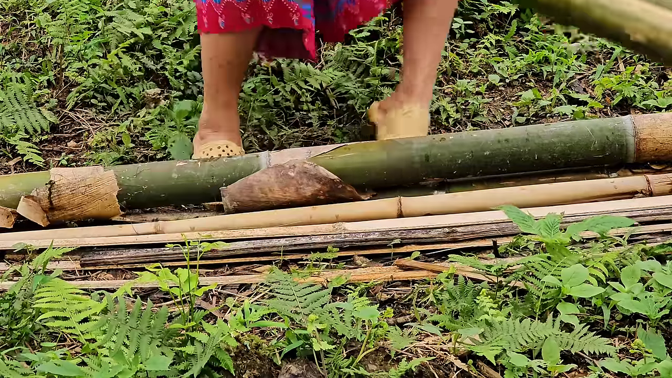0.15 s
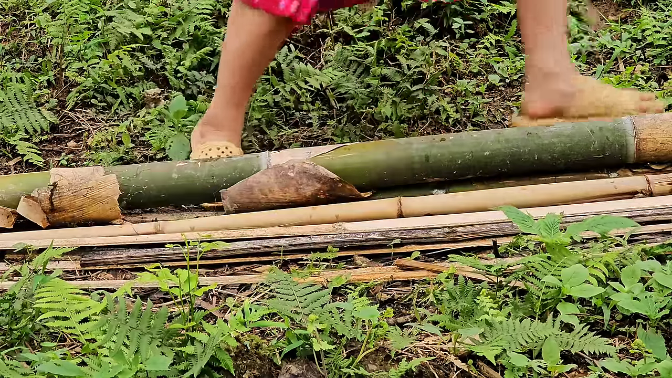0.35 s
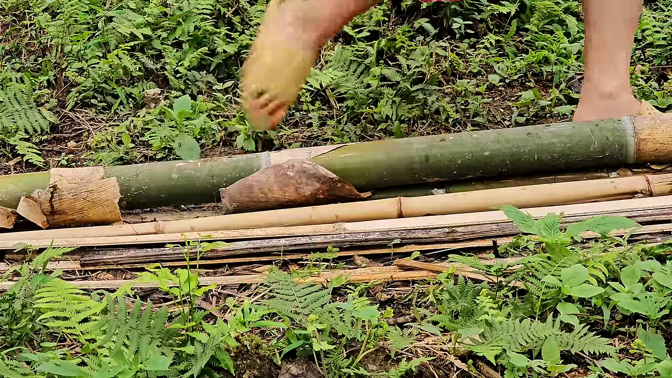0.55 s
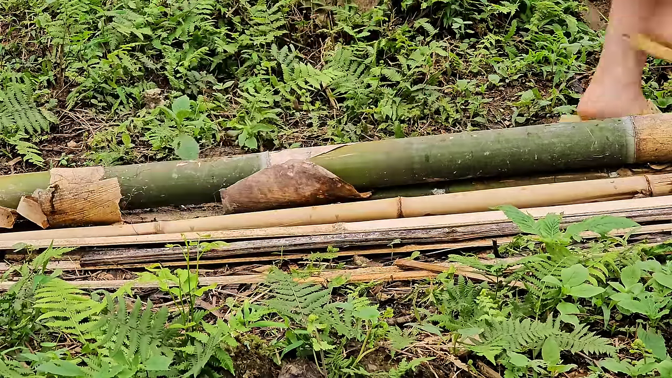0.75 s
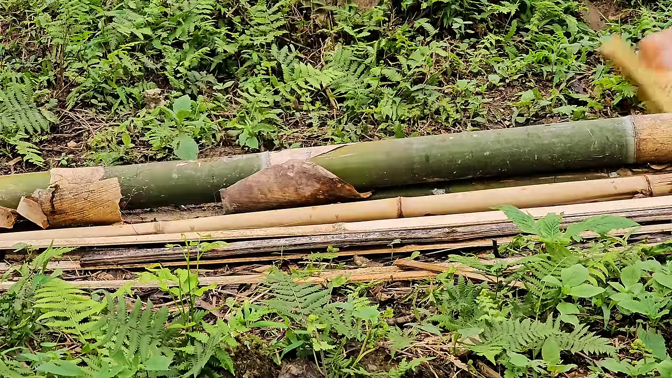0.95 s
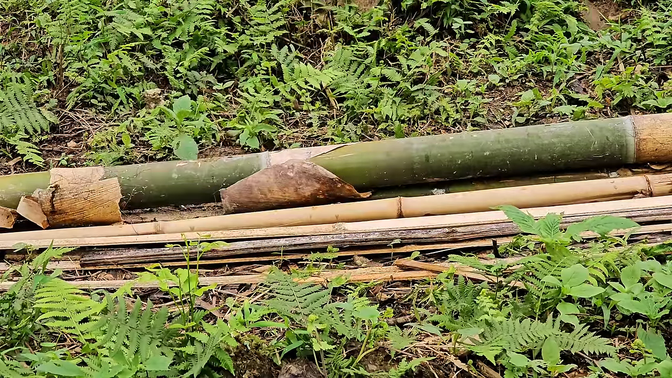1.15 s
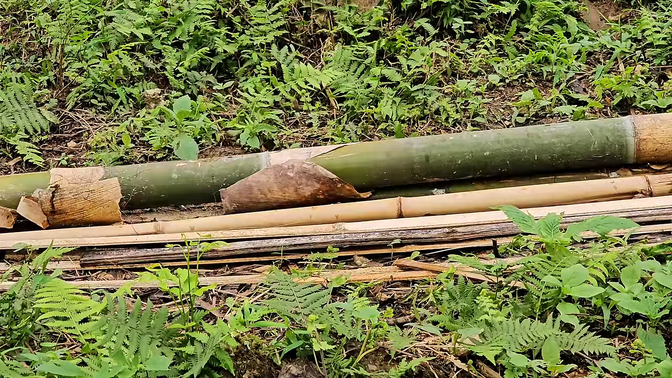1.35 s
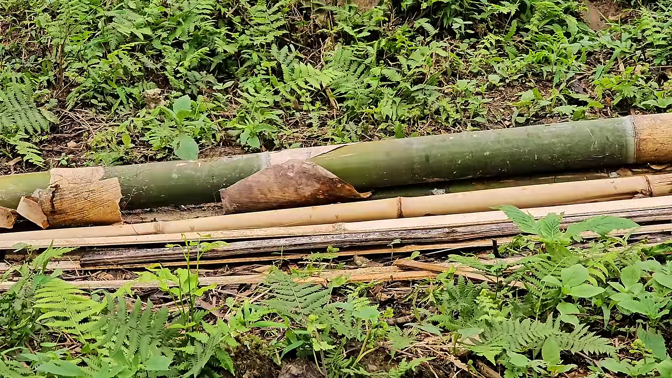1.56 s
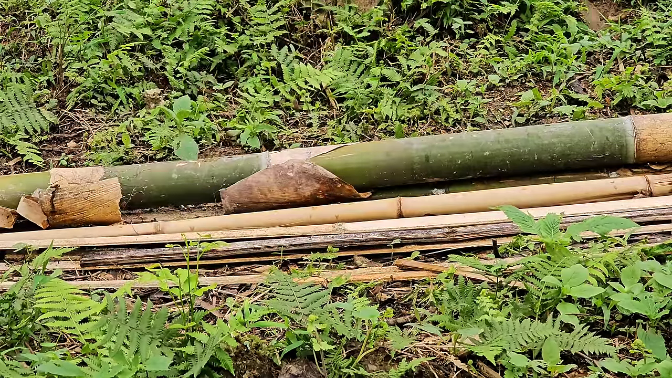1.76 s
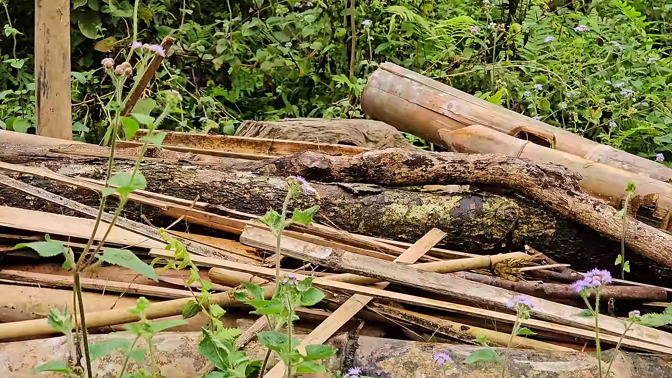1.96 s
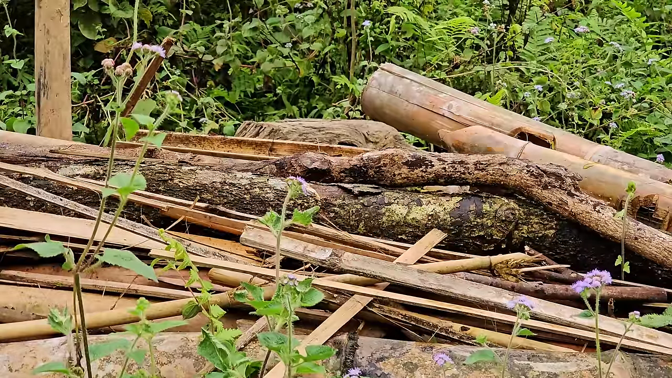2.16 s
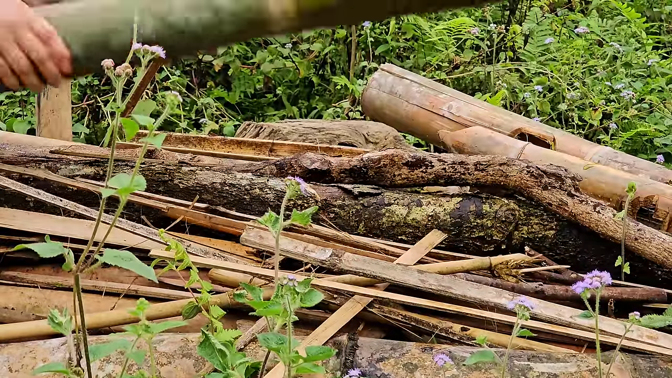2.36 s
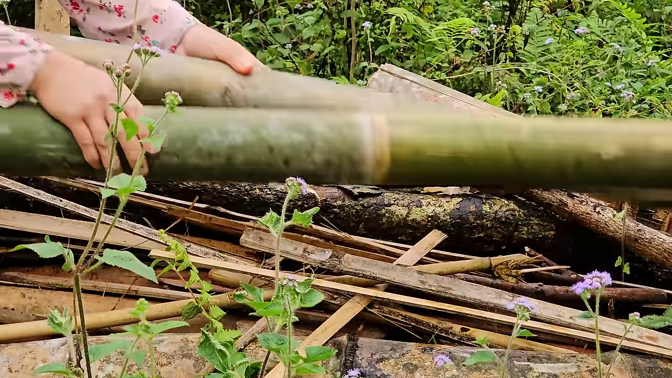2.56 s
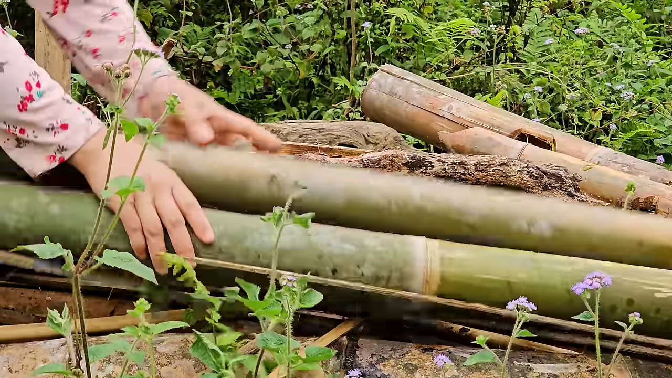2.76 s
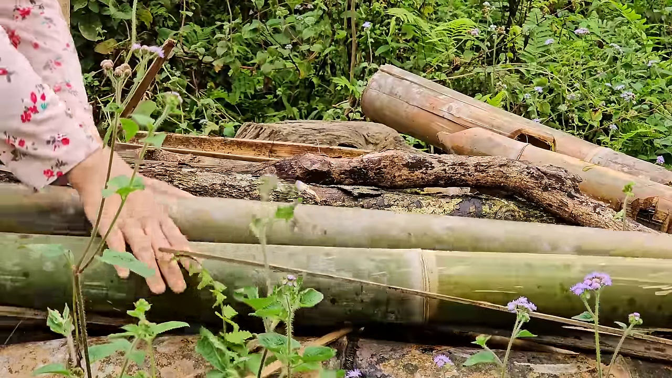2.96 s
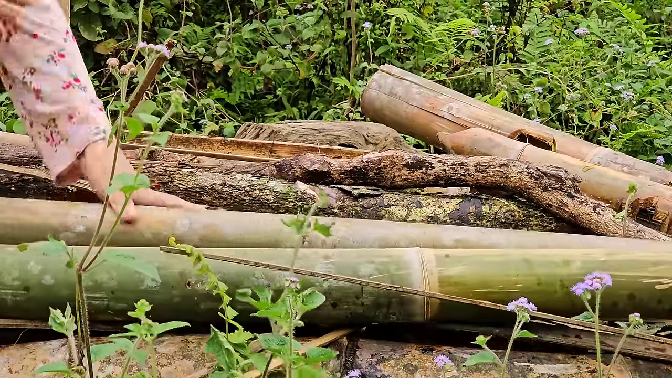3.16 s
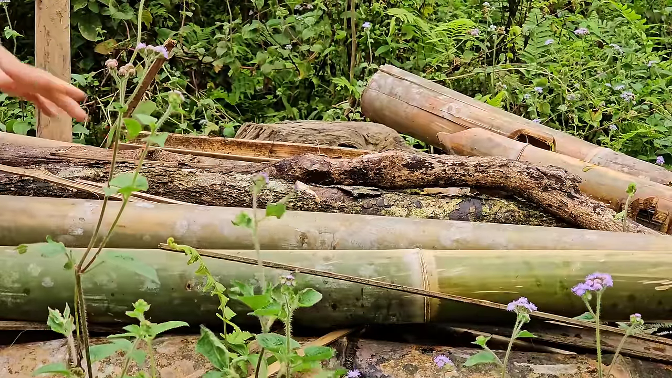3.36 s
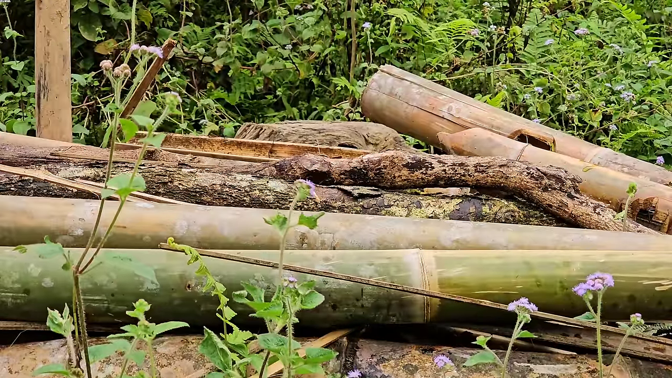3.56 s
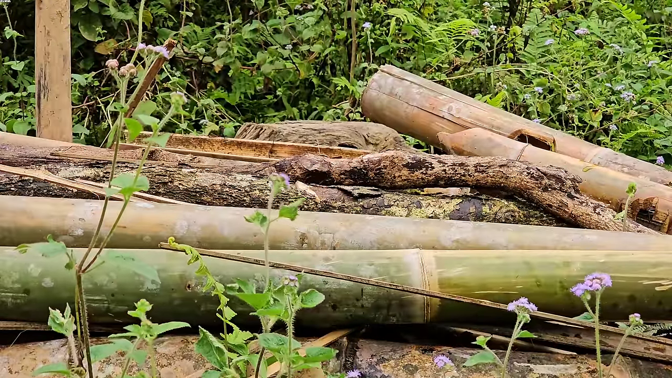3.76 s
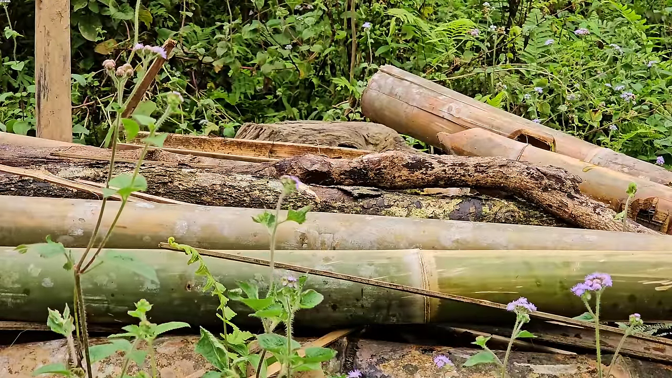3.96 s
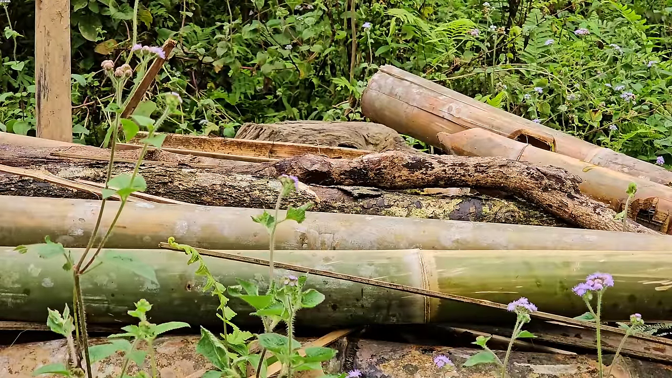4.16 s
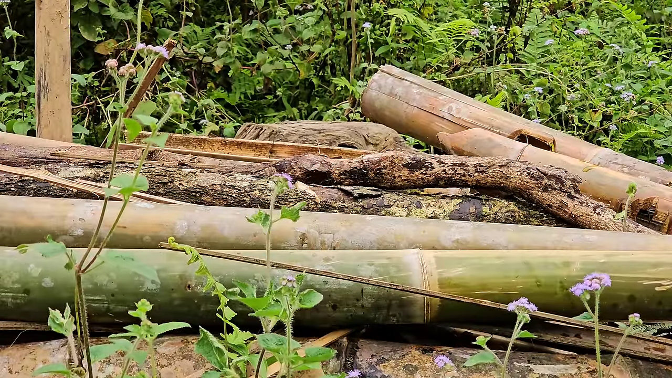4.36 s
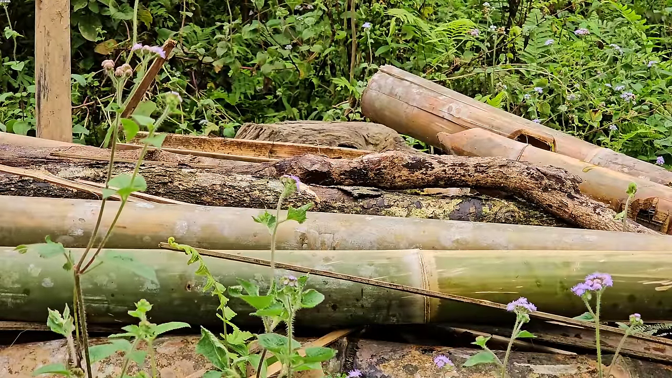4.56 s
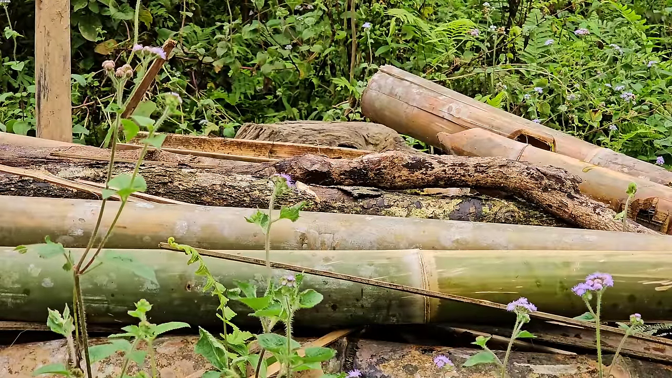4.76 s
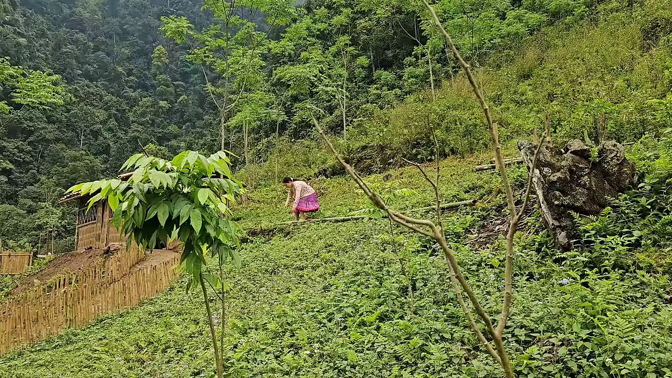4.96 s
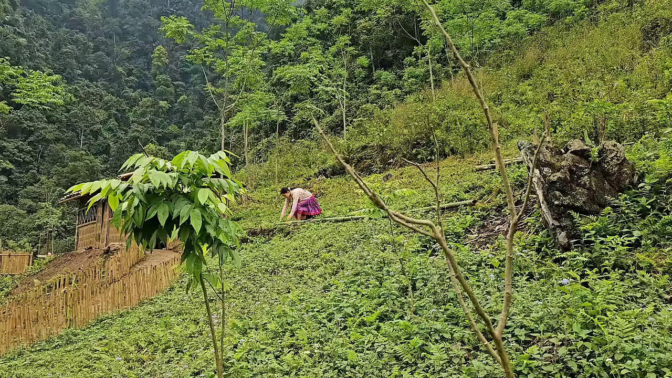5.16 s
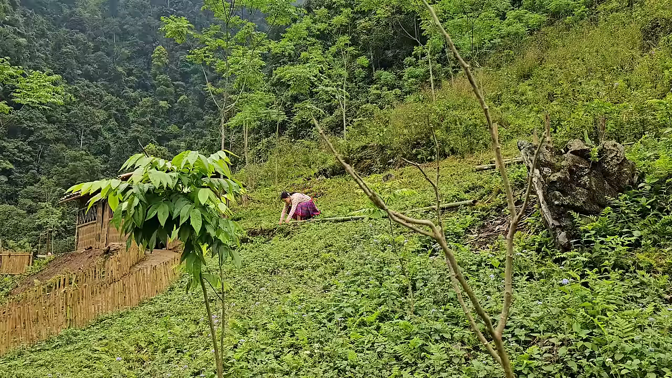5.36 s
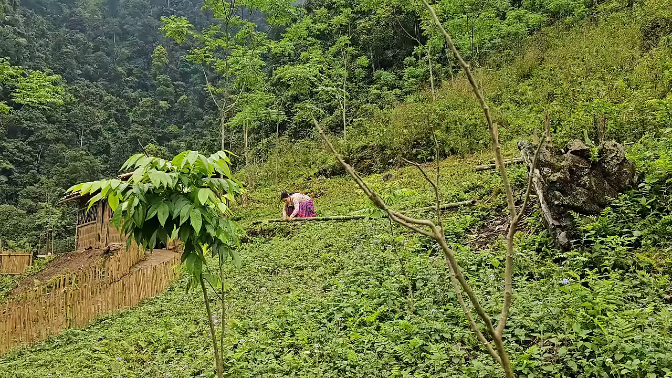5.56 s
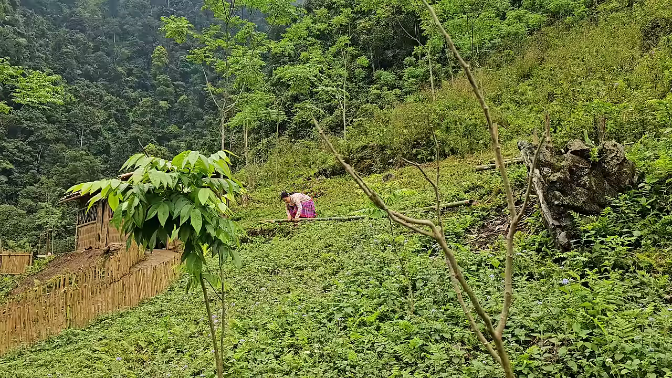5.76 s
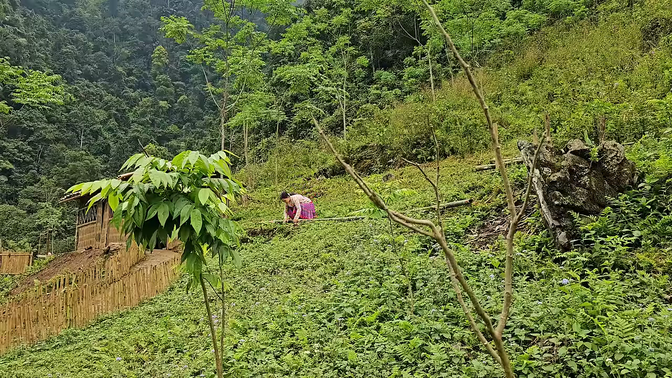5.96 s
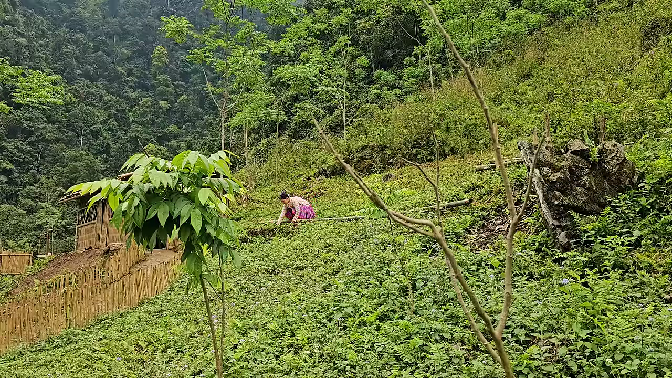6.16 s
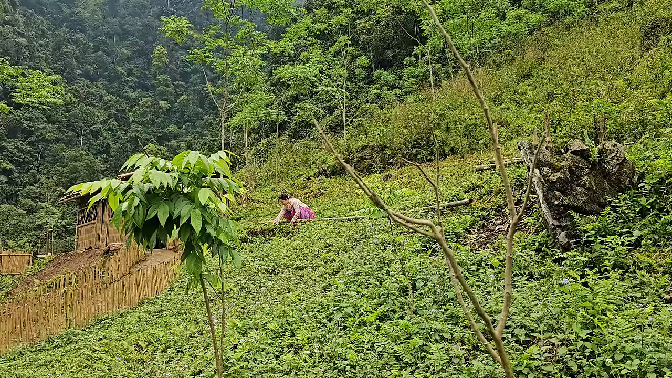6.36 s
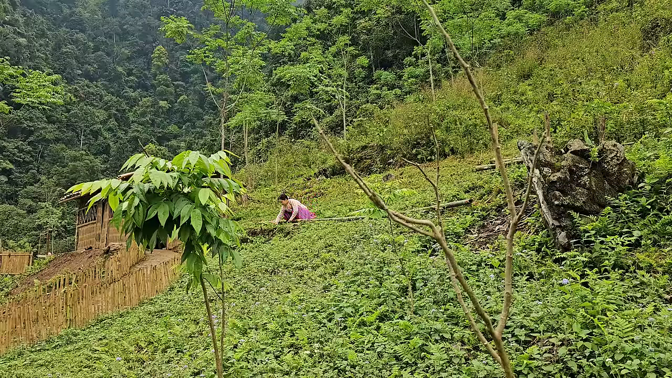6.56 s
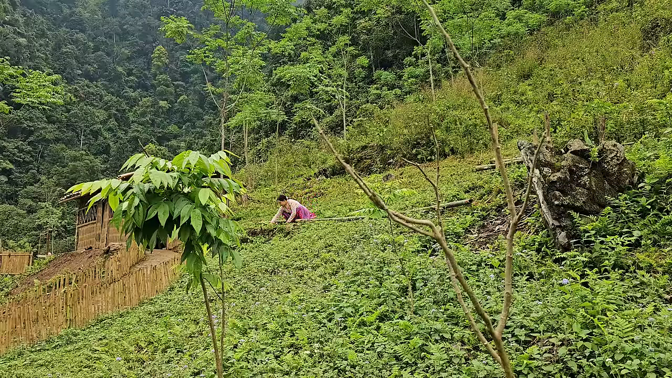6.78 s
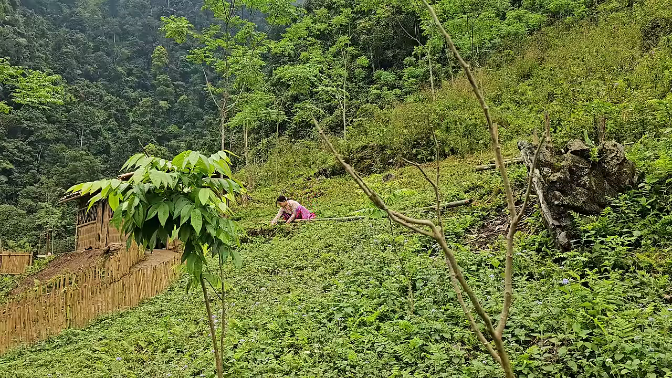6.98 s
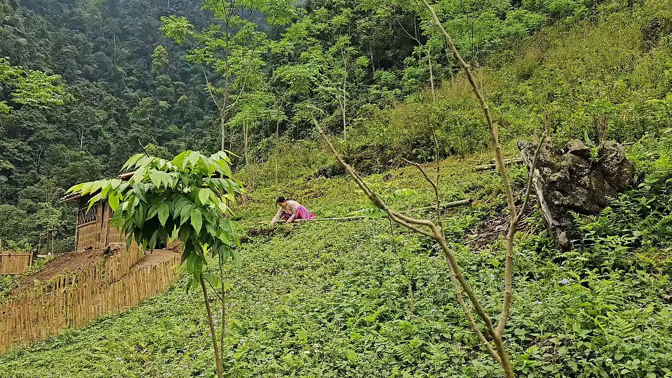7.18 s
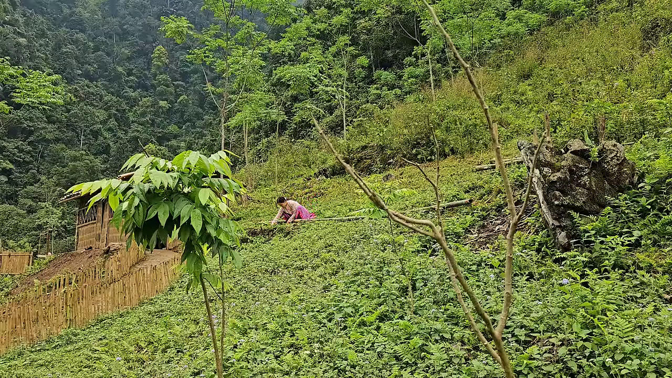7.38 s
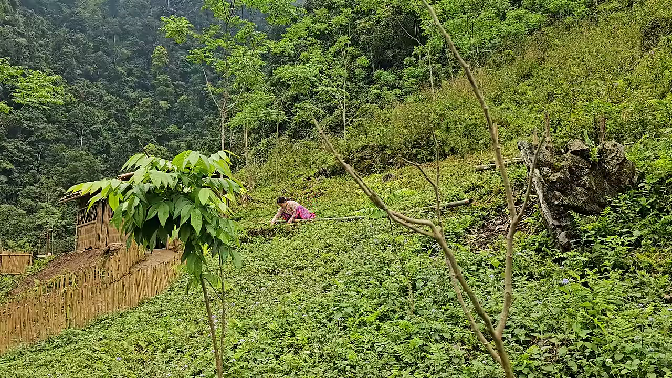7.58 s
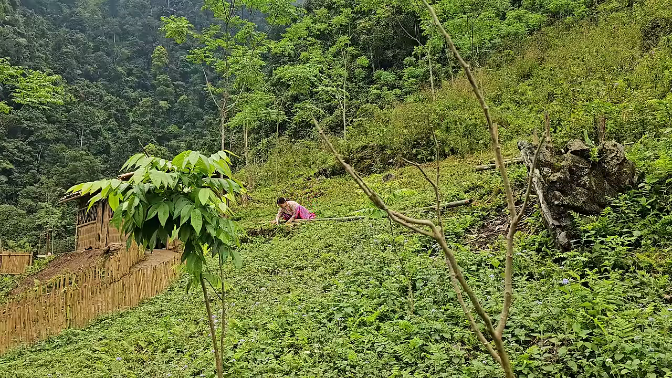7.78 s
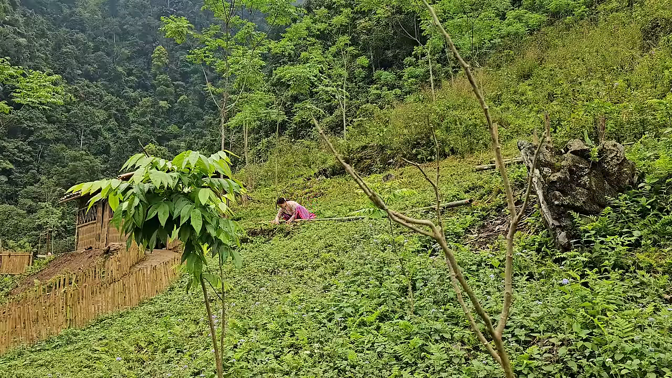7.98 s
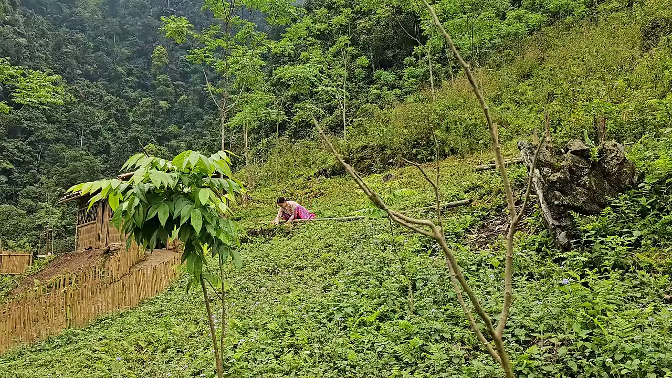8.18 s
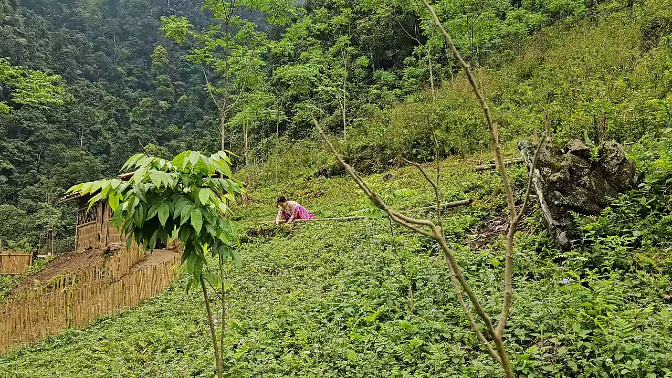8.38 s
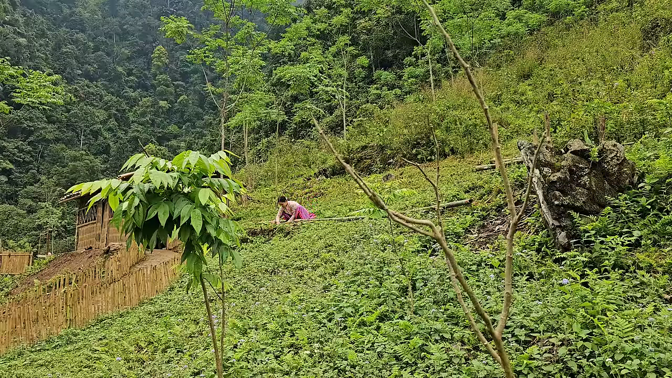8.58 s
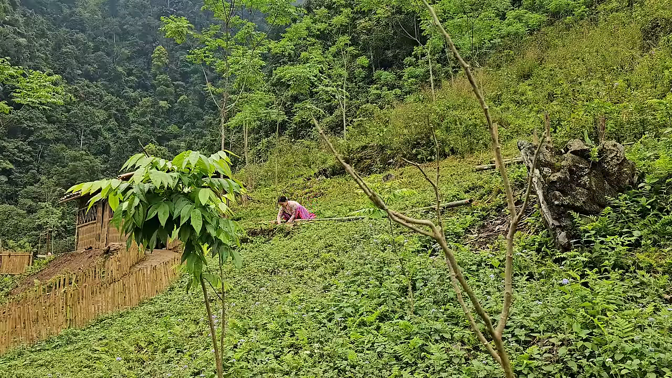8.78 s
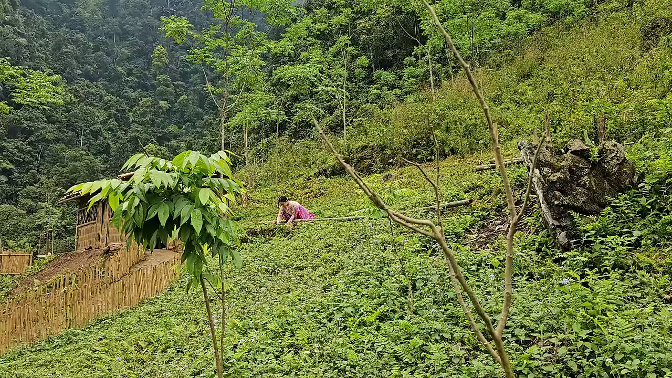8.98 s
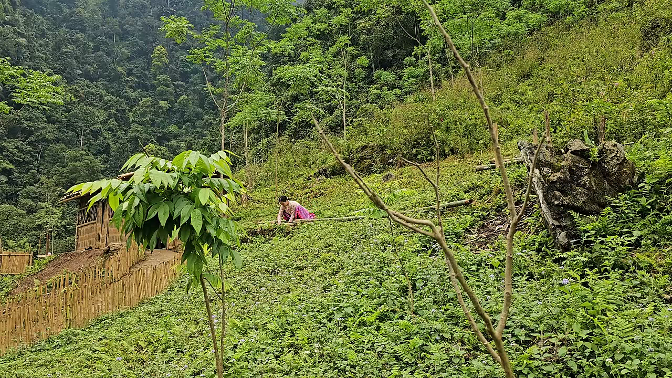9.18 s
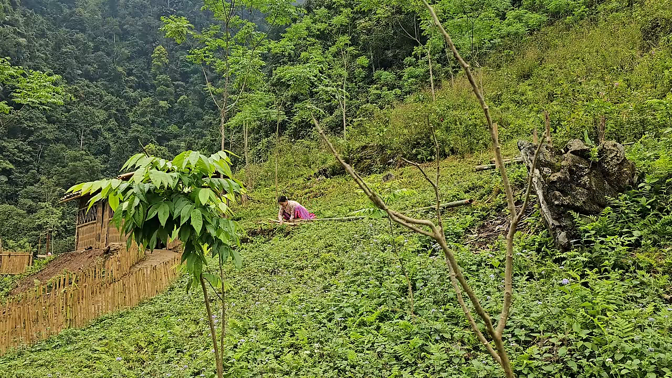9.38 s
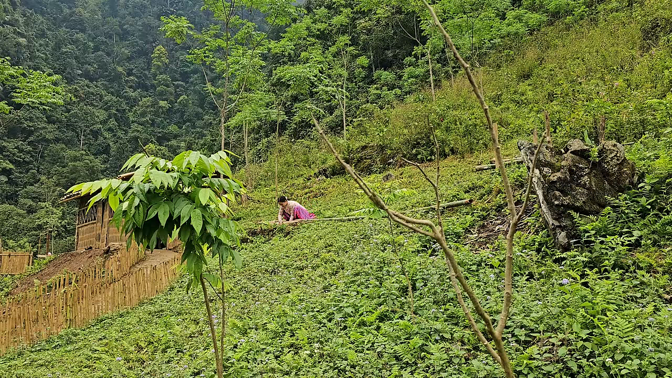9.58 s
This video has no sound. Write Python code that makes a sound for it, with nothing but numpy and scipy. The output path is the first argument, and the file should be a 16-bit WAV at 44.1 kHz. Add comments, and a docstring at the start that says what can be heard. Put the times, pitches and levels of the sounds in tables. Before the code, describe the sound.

Small close microphones pick up bamboo and firewood being handled: a couple of separate hollow thunks, leafy rustle and dragging, a brief skin-on-skin squeak, then a rapid clattering drop with booming tubes and stick cracks. It settles into a few light ticks. After about five seconds the ambience becomes quieter and more distant, with a continuous cicada drone, gliding cricket notes, fluttering chirps and sparse muted wood knocks near the end.

```python
"""In a forest clearing, hollow bamboo poles and firewood are lifted, dragged and dropped on a pile,
first close to a pair of small microphones, then far up a slope. Chattering contacts ring tubes, walls
and sticks; friction grains rustle and set the tubes humming. Crickets are short gliding tones, cicadas
are clicks and noise through resonances; a broad murmur of shaped noise and a low rumble lie underneath."""
import sys
import numpy as np
from scipy import signal
from scipy.fft import rfft, irfft, next_fast_len
from scipy.io import wavfile
from scipy.ndimage import uniform_filter1d

SR = 44100
rng = np.random.default_rng(int(sys.argv[2]) if len(sys.argv) > 2 else 0)


def store_wav(level_fs):
    """Save 16-bit WAV to argv[1]."""
    pcm = np.round(np.clip(np.atleast_2d(level_fs), -1, 1) * 32767)
    wavfile.write(sys.argv[1], SR, pcm.T.astype(np.int16))


N = 424673
T = np.arange(N) / SR
FAR_FROM_S = 4.95  # from here on the work is far up the slope

# Blows of wood on the pile: (time [s], boom peak level [dB], boom pitch [Hz], tube wall level re boom [dB],
# crack level re boom [dB], chatter time [ms])
BLOWS = [(0.0, -34.5, 233, -11.5, -12, 3.4), (0.322, -68, 300, -5, 29, 3), (0.441, -51, 250, 7.5, 6, 30),
         (0.54, -45, 328, 0, -1, 20), (0.562, -40.5, 315, 6, 2, 18), (0.627, -29.5, 450, 6, 13, 29),
         (0.63, -18, 208.3, 7, 0.5, 19.8), (0.633, -21, 140.4, -3, -12, 8),
         (1.294, -21, 198, -16.5, -12, 3.6), (1.344, -44, 316, 10.5, 0, 5.3), (1.55, -60, 200, -2, 28, 5.3),
         (1.745, -37, 200, -10, -24, 31), (1.844, -52, 252, -6, 11, 3.4), (1.99, -43.5, 221, 17.5, 5.5, 30),
         (2.032, -29.5, 282, 11, 0.5, 14), (2.077, -22, 221, -4, -7, 30),
         (2.18, -20.5, 336, 8.5, 16.5, 4.3), (2.19, -28.5, 300, 11, 10.5, 14.4),
         (2.208, -17.5, 266, 8.5, -3, 13.6), (2.355, -45, 239, 15, -6, 17), (2.454, -36, 211, -1, 10.5, 19),
         (2.489, -29, 252, 3.5, -17, 34), (2.529, -23.5, 211, -10, -36, 22), (2.645, -9, 240, -7.5, -9, 28),
         (2.66, -11, 273, -2.5, -18, 9), (2.709, -12, 221, 1.5, -37, 12), (2.724, -9, 212, -9, -1, 8.9),
         (2.743, -6.5, 217, 2, 1, 27), (2.771, -15, 218, 3.5, -21, 28), (2.823, -7.5, 198, -2, -1.5, 17.6),
         (2.873, -13.5, 231.7, -34, -29, 8.3), (2.976, -26, 245, -4, 0.5, 66),
         (3.012, -13.5, 253.5, -3, -14, 15.6), (3.059, -22.5, 208, -25, 9.5, 7.3),
         (3.101, -34.5, 200, 6, 19.5, 21.5), (3.125, -21.5, 210, -12.5, -15, 35),
         (3.14, -34.5, 200, 2, 13, 11.4), (3.254, -38.5, 221, 9.5, -5, 15),
         (3.643, -55, 454, 14.5, -0.5, 15), (3.684, -48, 450, -2, 12.5, 35),
         (3.728, -34, 367.5, -7, -11, 17), (3.761, -43, 443, 4, 0.5, 10), (3.787, -45.5, 346, 1, 3, 10),
         (4.183, -65.5, 250, 22, 13, 5), (4.3, -60, 200, 13, 10, 5), (4.39, -48, 148.5, 3, 5, 10.4),
         (4.495, -64.5, 178.3, 4, 21.5, 5.6), (4.638, -57, 263.5, 10.5, 12.5, 27),
         (4.82, -62.5, 250, 8.5, 10, 4.5), (4.859, -46, 150, -7, -3.5, 4.8),
         (5.811, -57, 303, 10.5, -7, 37), (5.876, -52.5, 276, 2, -4, 9.1),
         (5.902, -47, 243, -25.5, -9.5, 17), (7.699, -61, 175, 7, 8, 28), (7.772, -65, 264, -5, 18, 10),
         (7.879, -45, 359, 3.5, -0.5, 27), (7.955, -62, 300, 13, 15, 15), (8.284, -62.5, 182, 13, 16, 46),
         (8.545, -63.5, 302, 10.5, 12, 11), (8.635, -50, 360, 4, 6.5, 53), (8.71, -41, 351, 0, -2, 21),
         (8.765, -61, 303, 13.5, 10.5, 4), (8.785, -51, 304, -20, -11, 37), (9.175, -65.5, 380, 0, 17.5, 5),
         (9.258, -42, 365, -7, -3, 7.6), (9.402, -36, 352.6, -7, -4, 42), (9.41, -31, 406.4, 1, -8.5, 8),
         (9.433, -43.5, 416, -6, 11.5, 21), (9.604, -53, 370, -6, 17, 55)]
# Tube wall modes: (frequency [Hz], width before damping factor [Hz], mean level [dB])
WALL_MODES = [(522, 44, -9), (570, 39, -1), (630, 35, -7.5), (700.3, 68, 4), (739.3, 44, -1.5),
              (782.6, 54, 4), (1110, 300, -7.5)]
# Thin stick modes: (frequency [Hz], width before damping factor [Hz], mean level [dB])
STICK_MODES = [(1250, 48, -1), (1325, 38, -1), (1484, 110, 4.5), (1725, 69, -2.5), (1893, 79, 0.5),
               (2592, 300, -5.5), (3520, 120, -12)]


def gain_of(db):
    """Decibels to an amplitude factor."""
    return 10 ** (np.asarray(db) / 20)


def evened(x):
    """Scales to rms 1."""
    return x / np.sqrt(np.mean(x ** 2) + 1e-20)


def peaked(x):
    """Scales to peak 1."""
    return x / abs(x).max()


def read(points, hz):
    """Interpolates a spectrum table on a log frequency axis."""
    f, value = np.transpose(points)
    return np.interp(np.log(hz + 1), np.log(f + 1), value)


def curves(rows):
    """Every column after the time as a curve over the whole length."""
    s, *columns = np.vstack(rows).T
    return [np.interp(T, s, c) for c in columns]


def add(mix, s, sound):
    """Mixes a sound in at s seconds, cut at the end of the mix."""
    part = mix[:, max(round(s * SR), 0):][:, :sound.shape[1]]
    part += sound[:, :part.shape[1]]


def smoothed_noise(shape, *spans):
    """Slow random curve of rms 1: noise through moving averages of the given spans in samples."""
    x = rng.standard_normal(shape)
    for span in spans:
        x = uniform_filter1d(x, span)
    return evened(x)


def resonate(x, hz, width_hz):
    """Resonance on a moving pitch: shifts hz down to zero, smooths, and shifts back."""
    turn = np.exp(2j * np.pi * np.cumsum(hz * np.ones(x.shape[-1])) / SR)
    r = np.exp(-np.pi * width_hz / SR)
    return 2 * (turn * signal.lfilter([1 - r], [1, -r], x / turn)).real


def resonate_twice(x, hz, width_hz):
    """Two equal resonances in series, for steeper skirts."""
    return resonate(resonate(x, hz, width_hz), hz, width_hz)


def ring(modes, spread_db=0, damp=1, size=SR // 6):
    """Impulse response of dying modes; where the blow lands decides how strongly each one speaks."""
    f, width_hz, db = np.transpose(modes)[:, :, None]
    t = np.arange(size) / SR
    sense = (-1) ** np.arange(len(modes))[:, None]  # neighbouring modes swing in opposite sense
    level = gain_of(db + spread_db * rng.standard_normal(db.shape))
    decay = np.exp(-np.pi * damp * width_hz * t)
    return (sense * level * decay * np.sin(2 * np.pi * f * t)).sum(axis=0)


def pair(a, b, same):
    """Two channels with the given likeness, from two independent signals."""
    same = np.clip(same, -1, 1)
    return np.array([a, same * a + np.sqrt(1 - same ** 2) * b])


def sideways(x):
    """A source off to one side reaches the microphones a few samples apart."""
    left, right = pair(*x, 0.86)
    return np.array([left, np.roll(right, rng.integers(-20, 20))])


def coloured(x, spectrum):
    """Filters the last axis by a spectrum table, then scales to rms 1."""
    size = next_fast_len(x.shape[-1])
    gain = gain_of(read(spectrum, np.fft.rfftfreq(size, 1 / SR)))
    return evened(irfft(rfft(x, size) * gain, size)[..., :x.shape[-1]])


def tube_boom(db, hz, chatter_ms, far):
    """Response of the struck tube's air column, its longer ring and the shaking pile."""
    # after a short clean blow the hand damps the tube less
    linger_db = -13 + 4 * np.log2(16 / chatter_ms)
    boom = ring([(hz, 22, 0), (hz, 10, linger_db), (hz * 1.27, 45, -8)])
    boom *= 1 - np.exp(-np.arange(len(boom)) / SR / 0.0035)  # the air column builds up over a cycle
    boom = signal.sosfilt(signal.butter(2, hz / 2, "high", fs=SR, output="sos"), boom)
    shake_db = db / 2 - 12.5 - 12 * far  # heavy blows shake the whole pile; far away this is weaker
    return boom + gain_of(shake_db) * ring([(65.9, 39, 0.0032)])


def crack_noise(contacts, press, chatter_ms):
    """Noise that follows the contacts and dies fast; short chatter cracks brighter."""
    # (frequency [Hz], density before tilt [dB per Hz])
    crack_spectrum = [(900, -32), (1600, -8), (3500, 2), (7500, -10), (12000, -17), (15500, -19.5),
                      (17000, -40)]
    t = np.arange(len(press)) / SR
    burst = signal.lfilter([1], [1, -np.exp(-1 / (.0015 * SR))], abs(contacts[0]))
    burst += .4 * press + 0.2 * np.exp(-t / 0.02983)
    tilt_db_per_octave = 2.5 * np.log2(32 / chatter_ms)
    tilted = [(f, level + tilt_db_per_octave * np.log2(f / 3500)) for f, level in crack_spectrum]
    return peaked(burst * coloured(sideways(rng.standard_normal((2, len(t)))), tilted))


def knock(db, hz, wall_db, crack_db, chatter_ms, far):
    """A burst of chattering contacts rings the air column, the wall and the sticks, with a crack on top."""
    t = np.arange(SR // 10) / SR
    hard = 1 / (1 + np.exp((-1 - crack_db) / 7.5))  # 0 to 1: blows with little crack land softly
    rise_s = .001 + (1 - hard) * 0.15 * chatter_ms / 1000
    press = (1 - np.exp(-t / rise_s)) * np.exp(-(1000 * t / np.clip(chatter_ms, 2, 60)) ** 1.4)
    contacts = rng.standard_normal((2, len(t))) * (rng.random((2, len(t))) < 900 / SR) * press
    contacts[:, SR // 1000] = .7 + .9 * hard  # one sure contact at 1 ms
    soft = uniform_filter1d(contacts, 6, axis=1)  # wood on wood is a soft contact

    stick_db = 1 + .45 * wall_db + .55 * crack_db  # the thin sticks speak between wall and crack
    bodies = [(tube_boom(db, hz, chatter_ms, far), .97, 0),  # response, left-right likeness, dB
              (ring(WALL_MODES, spread_db=6.5, damp=1.7), .85, wall_db),
              (ring(STICK_MODES, spread_db=5.5, damp=1.9), -.3, stick_db)]
    out = 0
    for response, same, rel_db in bodies:
        rung = signal.fftconvolve(pair(*soft, same), response[None], axes=1)
        out = out + gain_of(rel_db) * peaked(rung)
    out[:, :len(t)] += gain_of(crack_db) * crack_noise(contacts, press, chatter_ms)
    pan_db = 0.5 * rng.standard_normal()  # blows scatter left and right
    return gain_of(db + pan_db * np.array([[.5], [-.5]])) * out


def knocks():
    """All blows of poles and firewood on the pile, near and then far."""
    wood = np.zeros((2, N))
    for s, *blow in BLOWS:
        add(wood, s - .001, knock(*blow, s > FAR_FROM_S))
    return wood


def stroke(length_s, db, boom_db, wall_db, whistle_db, hz):
    """Clumped grains of friction hiss; the same slips set the tubes humming."""
    # (frequency [Hz], density [dB per Hz])
    rustle_spectrum = [(880, -28.5), (1500, -2.5), (2010, -7), (2470, -4), (2720, -13.5), (3510, -3),
                       (6560, -8.5), (7900, -8.5), (12100, -12), (15500, -15.5)]
    size = max(round(length_s * SR), 500)
    grains = gain_of(3.5 * np.minimum(rng.exponential(1, (2, size)), 5))
    grains = grains * (rng.random((2, size)) < 4000 / SR) * rng.choice([-1., 1.], (2, size))
    grains += .5 * rng.standard_normal((2, size))
    grains += 7 * rng.standard_normal(size) * (rng.random(size) < 45 / SR)  # now and then a twig ticks

    clumps = gain_of(2.5 * smoothed_noise(size, 400, 400))
    along = np.arange(size) / size
    press = clumps * np.minimum(along / 0.17, 1) * np.minimum((1 - along) / 0.51, 1)
    pressed = press * np.array([grains, rng.standard_normal((2, size))])
    grains, slide = np.pad(pressed, ((0, 0), (0, 0), (0, SR // 10)))  # room to ring out

    boom = evened(resonate(resonate(pair(*grains, 0.91), hz, 35), hz, 110))
    body = ring(WALL_MODES, spread_db=4) + gain_of(-5.0) * ring(STICK_MODES, spread_db=1.5)
    wall = evened(signal.fftconvolve(pair(*grains, 0.74), body[None], axes=1)[:, :grains.shape[1]])
    hiss = coloured(sideways(grains), rustle_spectrum)
    whistle = evened(resonate_twice(sideways(slide), 8200, 1510))  # smooth skin sliding on skin
    out = hiss + gain_of(boom_db) * boom + gain_of(wall_db) * wall + gain_of(whistle_db) * whistle
    return gain_of(db) * out


def strokes():
    """Dragging, rubbing and steps in leaves; a rubbed tube hums at the pitch of the knocks around it."""
    # (start [s], end [s], rustle level [dB], boom level re rustle [dB])
    rub_rows = [(0, 1.103, -64, -5), (0.216, .29, -57.5, -6.5), (.65, 0.824, -79.5, 27.5),
                (1.272, 1.38, -49, -10), (1.546, 1.728, -45, -9.5), (1.733, 1.915, -51.5, -8.5),
                (1.98, 2.168, -63.5, 24.5), (2.179, 2.248, -46, 4), (2.25, 2.449, -48, -3),
                (2.343, 2.436, -43.5, -3), (2.446, 2.519, -44.5, -3), (2.505, 2.642, -56.5, 6.5),
                (2.58, 2.698, -44.5, -6), (2.702, 2.798, -39.5, 12.5), (2.81, 2.915, -36, 7),
                (2.898, 3.024, -46.5, 10), (2.997, 3.155, -36.5, -0.5), (3.162, 3.403, -54, 2),
                (3.35, 3.451, -66.5, 7), (3.617, 3.849, -64.5, -1), (4.173, 4.271, -53.5, -20),
                (4.25, 4.544, -62, -15), (4.596, 4.778, -58, -19), (5.561, 5.651, -79.5, 0),
                (7.653, 8.055, -75.5, -5.5), (8.151, 8.45, -79, 0.5), (8.498, 8.9, -73, -4),
                (9.214, 9.409, -66, -10), (9.397, 9.695, -66, -12)]
    # One slide of skin on skin: (start [s], end [s], rustle level [dB], then re rustle:
    # boom [dB], wall [dB], whistle [dB])
    squeak = (1.783, 1.875, -53, -20, -20, 8)
    rubs = []
    for s, end, db, boom_db in rub_rows:
        wall_db = -2 + 0.54 * boom_db + 10 * (s > FAR_FROM_S)  # far away the rustle thins, the tubes carry
        rubs.append((s, end, db, boom_db, wall_db, -17))
    at_s, boom_hz = np.array(BLOWS)[:, [0, 2]].T
    wood = np.zeros((2, N))
    for s, end, *levels_db in rubs + [squeak]:
        hz = np.clip(np.interp((s + end) / 2, at_s, boom_hz), 190, 380)
        add(wood, s, stroke(end - s, *levels_db, hz))
    return wood


def note(hz, fall_hz, length_s, second_db):
    """A short tone gliding by fall_hz around hz, with a weak octave."""
    t = np.arange(round(length_s * SR)) / SR
    turn = 2 * np.pi * np.cumsum(hz + fall_hz * (.5 - t / length_s)) / SR
    return (np.sin(turn) + gain_of(second_db) * np.sin(2 * turn)) * signal.windows.tukey(len(t), .7)


def cricket_trill():
    """Groups of short falling notes, one beat of rest after each group; a phrase starts soft."""
    # (start [s], beat [s], level before swell and scatter [dB], first group pitch [Hz],
    # last group pitch [Hz], notes in each group [digits])
    phrases = [(3.82, .0178, -58, 4650, 4620, "1033"), (4.418, .0178, -55.5, 4620, 4700, "2223333"),
               (5.555, .01804, -50.5, 4200, 4380, "10101012222222322322"),
               (6.503, .0202, -58, 4520, 4460, "1222"), (7.322, .0173, -56.5, 4220, 4290, "101222"),
               (7.582, .0178, -63, 4270, 4400, "2222"), (7.885, .0185, -57, 4500, 4350, "3333"),
               (9.12, .0181, -62, 4230, 4300, "10002200222")]
    trill = np.zeros((1, N))
    for start, beat_s, db, first_hz, last_hz, groups in phrases:
        counts = np.array(list(groups), int)
        after_s = beat_s * (np.cumsum(counts + 1) - counts - 1)
        pitches_hz = np.linspace(first_hz, last_hz, len(counts))
        for late_s, hz, count in zip(after_s, pitches_hz, counts):
            swell_db = -5.5 * np.exp(-late_s / 0.056)
            for k in range(count):
                last_db = 1.5 * (k == count - 1)  # the last note of a group is a little louder
                level_db = db + swell_db + last_db + 1 + 1.73 * rng.standard_normal()
                tone = gain_of(level_db) * note(hz + 40 * k, 470, 0.014, -21.0)
                add(trill, start + late_s - .006 + .0168 * k, tone[None])
    pan_db = np.interp(T, [6.8, 7.4], [-1.5, 4.5])  # the later cricket sits further left
    return trill * gain_of([pan_db / 2, -pan_db / 2])


def bush_cricket():
    """Two-part chirps: a tone, a lower softer one, then a fluttering tail."""
    # (time [s], first part level [dB], first part pitch [Hz])
    chirp_rows = [(.11, -62, 7200), (.54, -57, 7100), (4.344, -60, 7270), (4.875, -59, 7170),
                  (6.017, -58.5, 7280), (6.165, -61.5, 7150), (6.306, -58, 7120), (6.443, -56, 7100),
                  (6.58, -58, 7070), (6.728, -55, 7120), (8.181, -52, 7450), (8.332, -59.5, 7200),
                  (8.468, -61, 7160), (8.888, -64, 7190)]
    chirps = np.zeros((1, N))
    for s, db, hz in chirp_rows:
        flutter = smoothed_noise(round(.08 * SR), 220)
        add(chirps, s - .003, gain_of(db) * note(hz, 150, .017, -60)[None])
        add(chirps, s + .013, gain_of(db - 5) * note(hz - 350, 200, .016, -60)[None])
        add(chirps, s + .03, gain_of(db - 11) * flutter * note(hz - 50, 100, .08, -60)[None])
    return chirps


def rising_whistles():
    """Single tones gliding steadily upward."""
    # (time [s], length [s], level [dB], start pitch [Hz], end pitch [Hz])
    whistle_rows = [(1.08, 0.085, -62, 3000, 4520), (6.797, 0.16, -74, 2880, 4220)]
    whistles = np.zeros((1, N))
    for s, length_s, db, low_hz, high_hz in whistle_rows:
        tone = note((low_hz + high_hz) / 2, low_hz - high_hz, length_s, -60)
        add(whistles, s, gain_of(db) * tone[None])
    return whistles


def through_foliage(x):
    """Foliage smears a short tail of random echoes, different in each channel."""
    t = np.arange(SR // 8) / SR
    leaves = .008 * rng.standard_normal((2, len(t))) * np.exp(-t / .03)
    leaves[0, 0] = leaves[1, 1] = 1  # the right channel's direct sound is one sample later
    return signal.oaconvolve(x, leaves, axes=1)[:, :N]


def cicadas():
    """Fast jittered tymbal clicks ring a broad high resonance; a far chorus holds a steady noisy drone."""
    # (time [s], buzz level before waver [dB], buzz centre [Hz], drone gain before waver [dB])
    song = [(0, -58, 4512, -68), (.5, -70, 4600, -74.5), (1, -61, 4688, -73), (1.35, -61, 5100, -77),
            (3.2, -58, 4705, -69.5), (4.1, -60, 5300, -77), (4.25, -68.5, 4400, -74.5),
            (4.8, -61, 4264, -74.5), (5.3, -60.5, 5000, -83), (6, -60, 5050, -79), (7.1, -62, 4850, -82),
            (8, -60.5, 5100, -74.5), (8.5, -63.5, 5323, -73.5), (9, -64, 5090, -74),
            (9.63, -60.5, 5350, -68)]
    drone_hz = 2203
    buzz_db, buzz_hz, drone_db = curves(song)
    clicks_per_s = 265 * (1 + 0.021 * smoothed_noise((2, N), 300))
    clicks = np.diff(np.floor(np.cumsum(clicks_per_s, axis=1) / SR), prepend=0, axis=1)
    noise = rng.standard_normal((2, 2, N))
    buzz = evened(resonate_twice(.45 * evened(clicks) + noise[0], buzz_hz, 700))
    drone = evened(resonate(noise[1], drone_hz, 60))
    drone += 1.9 * evened(resonate_twice(noise[1], drone_hz, 330))
    waver_db = smoothed_noise((2, N), SR // 10, SR // 10)  # the loudness of buzz and drone wavers slightly
    return gain_of(buzz_db + waver_db[0]) * buzz + gain_of(drone_db + 2 * waver_db[1]) * drone


def handling_and_air():
    """Murmur of random short-time spectra with drifting patches, over a low rumble of shaped noise."""
    # (frequency [Hz], density [dB per Hz])
    murmur_spectrum = [(25, -19.5), (113, -5.5), (260, -7.5), (500, -13.5), (970, -13.5), (1800, -16.5),
                       (3400, -16), (6000, -24), (8300, -21), (10400, -32), (15500, -29), (17000, -38)]
    # (frequency [Hz], left-right likeness [-1 to 1])
    murmur_likeness = [(60, 1), (180, 0.48), (550, 0.15), (1650, -0.28), (4970, 0.37), (15000, 0.13)]
    # Both swell while the wood is handled near 2 s: (time [s], broad murmur level [dB], low rumble level [dB])
    handling_and_air_levels = [(0, -58, -67), (1.5, -57.5, -68.5), (2, -48.5, -55.5), (3.4, -59.5, -63),
                               (4.85, -61, -61.5), (5, -65.5, -73.5), (6, -66, -71), (7.5, -66.5, -81),
                               (9.63, -63.5, -86)]
    murmur_db, rumble_db = curves(handling_and_air_levels)

    frames, hz = N // 256 + 5, np.fft.rfftfreq(1024, 1 / SR)
    a, b, c, d, patches = rng.standard_normal((frames, 513, 5)).T
    patches = evened(uniform_filter1d(uniform_filter1d(patches, 10, 0), 12, 1))
    z = pair(a + 1j * b, c + 1j * d, read(murmur_likeness, hz)[:, None])
    z = z * gain_of(read(murmur_spectrum, hz)[:, None] + 1.3 * patches)
    murmur = evened(signal.istft(z, nperseg=1024, noverlap=768)[1][:, :N])

    rumble_spectrum = [(15, -12.0), (35, -2.5), (90, -3.5), (160, -13), (400, -47.5)]  # (Hz, dB per Hz)
    rumble = coloured(pair(*rng.standard_normal((2, N)), 0.87), rumble_spectrum)
    return gain_of(murmur_db) * murmur + gain_of(rumble_db) * rumble


def scene():
    """Wood work, insects, murmur and rumble together."""
    insects = through_foliage(cricket_trill() + bush_cricket() + rising_whistles())
    return knocks() + strokes() + insects + cicadas() + handling_and_air()


def record(dry):
    """Brief level dips, the microphone's bass roll-off, soft overload on loud blows, then the band limit."""
    # (time [s], half width to 1/e of the dip in dB [s], depth [dB])
    dips = [(1.924, 0.046, -11), (4.951, 0.053, -9.5)]
    dip_db = sum(db * np.exp(-((T - s) / half_s) ** 2) for s, half_s, db in dips)
    thin = signal.sosfilt(signal.butter(4, 45, "high", fs=SR, output="sos"), dry * gain_of(dip_db))
    low_pass = signal.firwin(511, 15900, window=("kaiser", 9), fs=SR)
    return signal.oaconvolve(np.tanh(thin), low_pass[None], "same")


dry = scene()
out = record(dry)
store_wav(out)
```